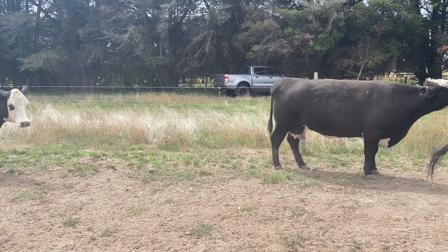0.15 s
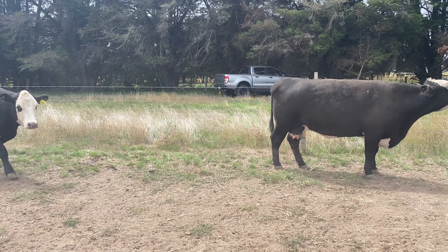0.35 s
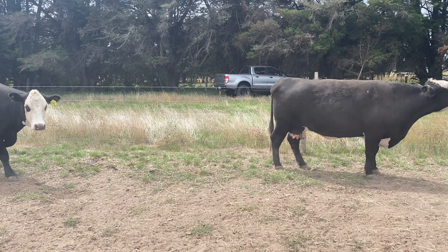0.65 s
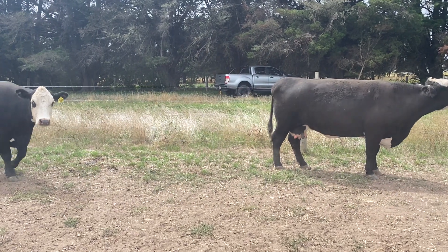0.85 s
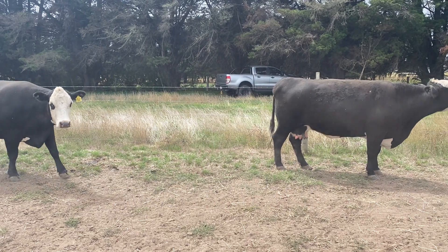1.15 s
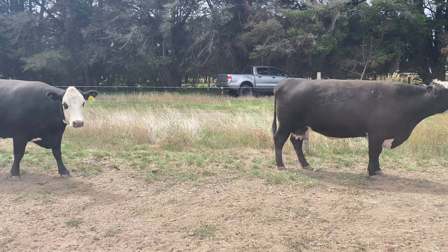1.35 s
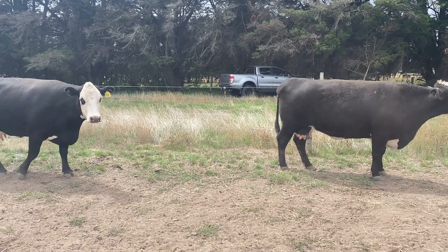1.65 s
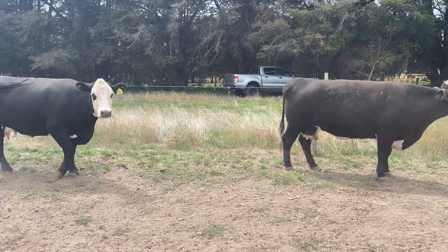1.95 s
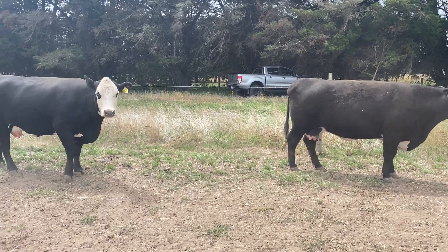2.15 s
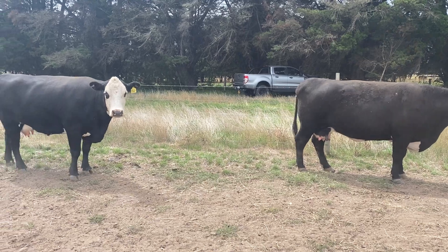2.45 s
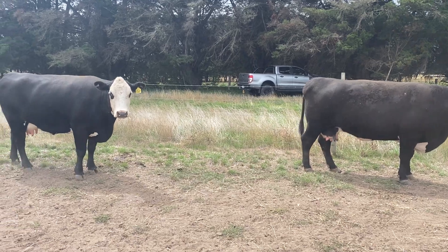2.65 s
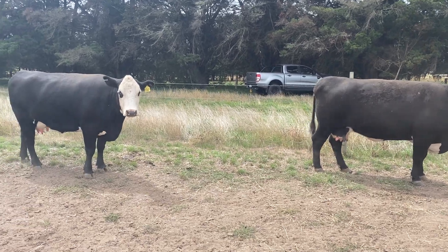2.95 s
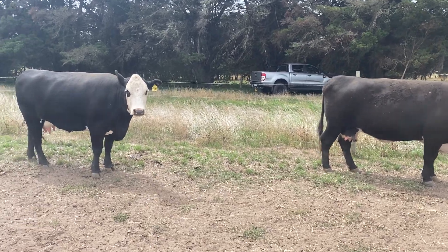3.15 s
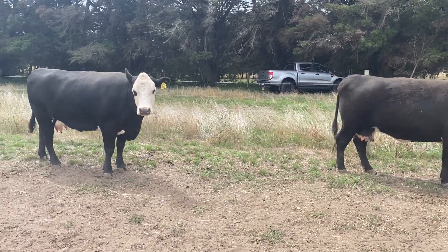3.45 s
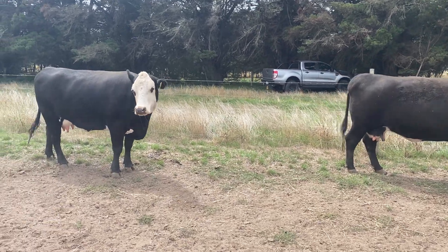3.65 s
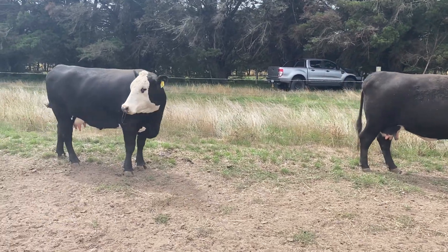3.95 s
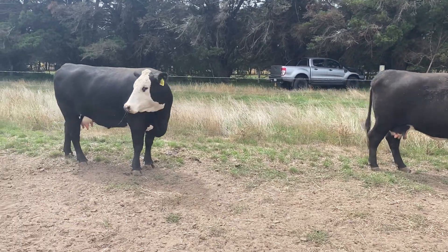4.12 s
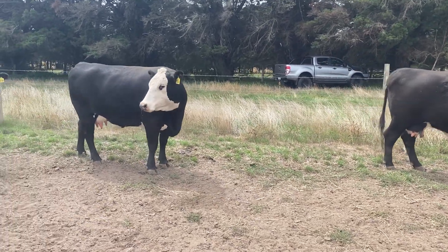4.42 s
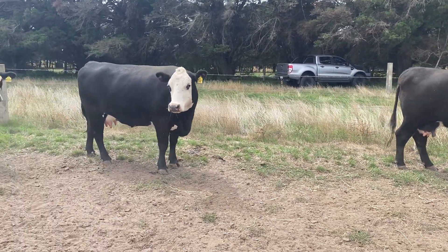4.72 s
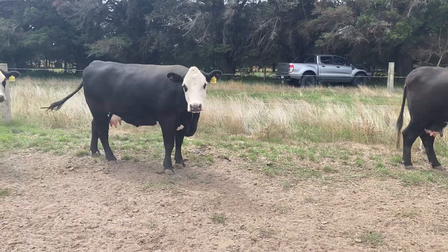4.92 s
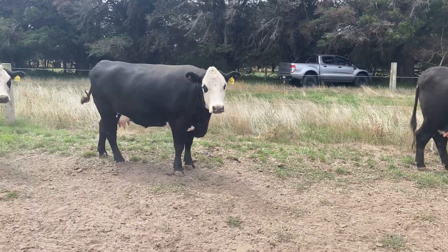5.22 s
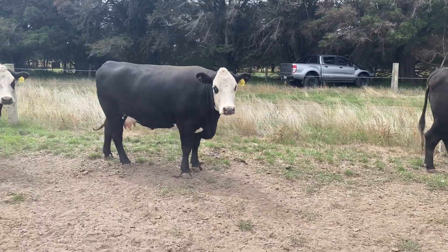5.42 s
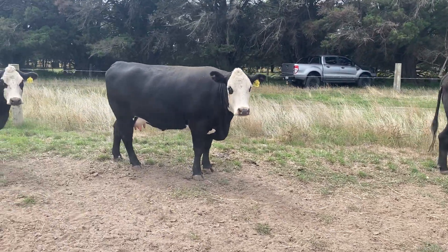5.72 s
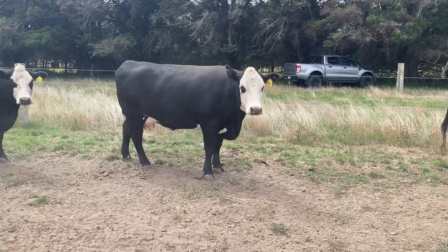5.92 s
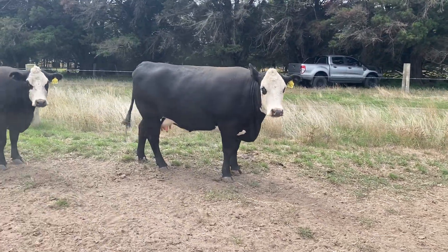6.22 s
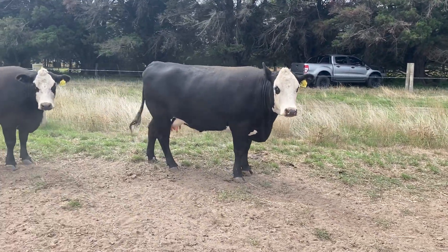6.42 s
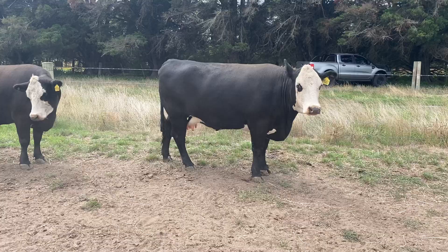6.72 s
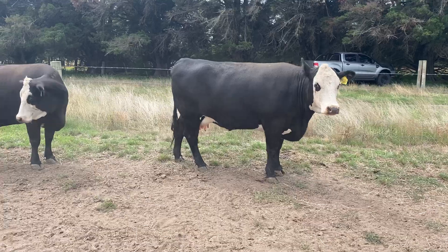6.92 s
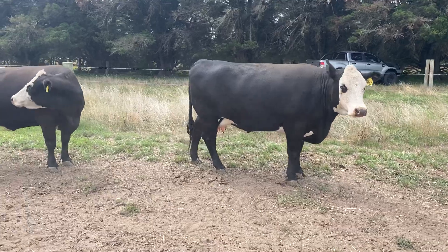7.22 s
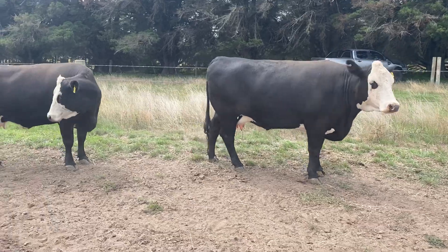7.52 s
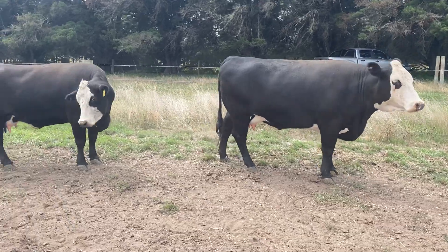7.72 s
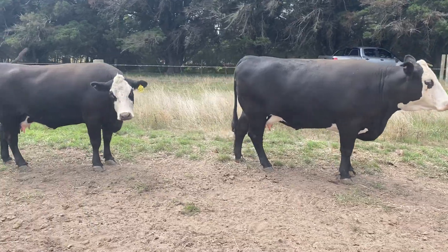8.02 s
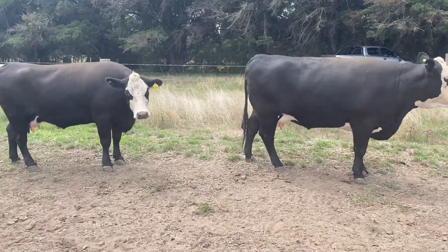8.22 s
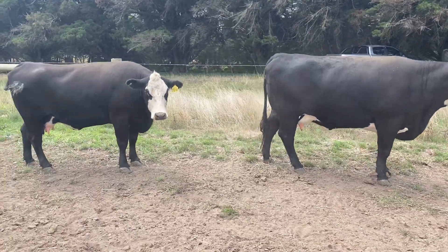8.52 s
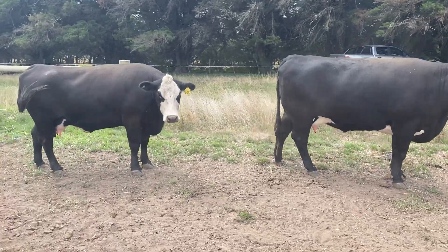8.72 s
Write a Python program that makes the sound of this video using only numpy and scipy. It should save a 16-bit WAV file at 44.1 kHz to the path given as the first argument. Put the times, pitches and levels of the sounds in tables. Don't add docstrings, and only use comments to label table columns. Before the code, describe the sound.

In a dry paddock edged by tall trees, a near cow repeats a half-second, low buzzy moo that rises and shuts off, about once a second, growing louder. Cows on either side overlap it, two calf bawls come higher, and a distant herd murmurs. Soft wind bumps and very faint insects lie below; stereo outdoor pickup, fairly dry, with a dull tree echo.

```python
import sys
import numpy as np
from scipy import signal
from scipy.fft import rfft, irfft, next_fast_len
from scipy.io import wavfile
from scipy.ndimage import uniform_filter1d

SR = 44100
rng = np.random.default_rng(int(sys.argv[2]) if len(sys.argv) > 2 else 0)


def wav_out(sig):
    wavfile.write(sys.argv[1], SR, np.round(np.clip(np.atleast_2d(sig).T, -1, 1) * 32767).astype(np.int16))


def volts_from_decibels(level):
    exponent = np.asarray(level, float) / 20
    return 10 ** exponent


N = 391166


def rms_one(x):
    return x / np.sqrt(np.mean(x ** 2) + 1e-20)


def table_at(table, when_s):
    s, *columns = np.transpose(table)
    return [np.interp(when_s, s, column) for column in columns]


def low_pass(x, order, hz):
    return signal.sosfilt(signal.butter(order, hz, fs=SR, output="sos"), x)


def drift(rate, size):
    r = np.exp(-80 * np.pi * rate / SR)
    white = rng.standard_normal(size // 40 + 2002)
    slow = signal.lfilter([1], [1, -2 * r, r * r], white)[2000:]
    return np.interp(np.arange(size) / 40, np.arange(len(slow)), slow / (np.std(slow) + 1e-9))


def resonance(x, hz, width_hz):
    r = np.exp(-np.pi * width_hz / SR)
    b = (1 - r * r) / 2 * np.array([1, 0, -1])
    a = [1, -2 * r * np.cos(2 * np.pi * hz / SR), r * r]
    return signal.lfilter(b, a, signal.lfilter(b, a, x))


def two_ears(x, ears, pan_db):
    size = next_fast_len(len(x) + 512)
    hz, tilt_db, turn = np.transpose(ears)
    pitch = np.log(np.arange(size // 2 + 1) * SR / size + 1)
    half = volts_from_decibels((pan_db + np.interp(pitch, np.log(hz), tilt_db)) / 2)
    late = np.exp(-1j * np.interp(pitch, np.log(hz), turn))
    return irfft(rfft(x, size) * np.array([half * late, 1 / half]), size)[:, :len(x)]


def folds_and_breath(pitch):
    jitter, breath_db = 0.003, -11
    size = len(pitch)
    cycles = rng.random() + np.cumsum(pitch * (1 + jitter * drift(40, size))) / SR
    closing = np.flatnonzero(np.diff(np.floor(cycles))) + 1
    early = cycles[closing] % 1 / (cycles[closing] - cycles[closing - 1])
    folds = np.zeros(size)
    folds[closing] = 1 - early
    folds[closing - 1] = early
    puff = rng.standard_normal(size) * np.exp(-1.8 * (cycles % 1))
    hiss = signal.sosfilt(signal.butter(2, 2200, "high", fs=SR, output="sos"), puff)
    return low_pass(rms_one(folds), 3, 2600) + volts_from_decibels(breath_db) * rms_one(hiss + 0.024 * puff)


def shaping_db(hz, part, sag, unclimbed):
    db = -85 * sag * np.clip(np.log2(hz / 480), 0, 1.2) * (0.12 if hz > 2000 else 1)
    db += 50 * sag * np.exp(-(sag / 0.17) ** 2 - (np.log2(hz / 460) / 0.75) ** 2)
    db -= 89.5 * sag * (part == "throat")
    db -= 42.5 * np.minimum(sag, 0.2) * (part == "chest")
    db -= 69.5 * np.clip(sag - 0.09, 0, 1) * (part == "closing")
    db -= 22.5 * unclimbed * (part == "ring")
    db += 25 * sag * (hz < 150)
    db += 45 * np.clip(sag - 0.25, 0, 1) * (150 < hz < 300)
    db += 110 * np.minimum(sag, 0.17) * (part == "boom")
    db -= 12 * unclimbed * np.clip(np.log2(hz / 2600), 0, 2.5)
    return db


def moo(rows, throat, parts, pose):
    s, pitch_hz, level_db = np.transpose(rows)
    place, (stretch, swallowed), posed_db = pose
    start = max(int(s[0] * SR), 0)
    t = np.arange(start, min(int((s[-1] + 0.03) * SR), N)) / SR
    pitch = uniform_filter1d(np.interp(t, s, pitch_hz), size=900, mode="nearest")
    source = folds_and_breath(pitch)
    highest = np.maximum.accumulate(pitch)
    sag = 1 - pitch / highest
    unclimbed = 1 - highest / pitch_hz.max()
    voice = np.zeros(len(t))
    for (hz, width_hz, db), part in zip(throat, parts):
        if part == "ring":
            hz = hz * stretch
        restless_db = 1.4 if hz < 2000 else 2.6 if width_hz < 300 else 1.1
        moving_db = shaping_db(hz, part, sag, unclimbed) + restless_db * drift(7, len(t))
        tone = low_pass(resonance(source, hz, width_hz), 4, 1.35 * hz)
        voice += volts_from_decibels(db + posed_db.get(part, 0) + moving_db) * tone
    voice = voice - np.clip(swallowed, 0, 1) * resonance(voice, hz=278.7, width_hz=120)
    power = uniform_filter1d(uniform_filter1d(voice ** 2, size=1000), size=1000)
    even = voice / np.sqrt(power + 1e-9)
    fade_in = np.clip((t - s[0]) / 0.03 + (start == 0), 0, 1)
    fade_out = np.clip((s[-1] + 0.03 - t) / 0.04, 0, 1)
    effort_db = uniform_filter1d(np.interp(t, s, level_db), size=1000)
    effort_db -= 9 * np.clip((sag - 0.21) / 0.084, 0, 1) * ("boom" in parts)
    return start, fade_out * fade_in * two_ears(even * volts_from_decibels(effort_db), *place)


def call_rows(call, shape):
    start_s, length_s, low_hz, top_hz, level_db = call
    share, climb, effort_db = np.transpose(shape)
    pitch_hz = low_hz + (top_hz - low_hz) * climb
    return np.transpose([start_s + length_s * share, pitch_hz, level_db + effort_db])


def animal(calls, shape, throat, parts, poses, gain_db):
    out = np.zeros((2, N))
    for call, pose in zip(calls, poses):
        start, sound = moo(call_rows(call, shape), throat, parts, pose)
        out[:, start:start + sound.shape[1]] += volts_from_decibels(gain_db) * sound
    return out


def standing(calls, shape, throat, place, gain_db, parts=["still"] * 11, mouth_db=[0] * 9, nose_db=[0] * 9):
    poses = [[place, (1, 0), dict(mouth=m_db, wide=8.0 * m_db, nose=n_db)]
             for m_db, n_db in zip(mouth_db, nose_db)]
    return animal(calls, shape, throat, parts, poses, gain_db)


# (pitch [Hz], left-right [dB], left lag [radians])
EARS_NEAR = [(150, -0.5, 2.1), (273, -3, 1.55), (350, -5, 0.98), (566, 2.5, 1.58), (650, -2.5, 2.5),
             (1000, -4, 1.62), (1800, 1, 2), (2700, 4, .2)]
EARS_TURNED = [(150, 1.5, 1), (250, -2.5, 1.72), (505, 1.5, 2), (760, 1.5, 3.5), (1370, -3.5, 3.5),
               (2200, 2.5, 1.93), (2900, 5, -1.7), (3800, 0, 0.96)]
# (time [s], left-right [dB], chest [dB], throat [dB], mouth [dB], bright [dB], nose [dB])
NEAR_HEAD = [(0, 0.5, 10, 16, -2, 10, 18.5), (0.899, 1, 8.5, 12, -2, 4.5, 15), (2, 0.5, 5.5, 9, 2.5, 3, 15),
             (3.5, 0, 2, 6.5, 5.5, -0.5, 6.5), (5.402, 0, 4, 1.5, 3.5, -3.5, 2),
             (6.296, -1.5, 3.5, 6, -1, -0.5, 10), (7.202, -0.9, 2.5, -20, 4, 7, -22.5),
             (8.098, -0.5, 3.5, -27.5, 6.5, 10.5, -27), (8.8, -2.5, 6.5, -8, 12, 10.5, -5)]
# (time [s], level [dB])
NEAR_TONGUE = [(0, -3.5), (5.4, 2), (6.3, 5), (7.2, -1.5), (8.1, 10), (8.8, -4.5)]
# (time [s], level [dB])
NEAR_DEPTH = [(0, 2), (2.002, 1.5), (4.5, 2.5), (6.301, -1), (7.299, 6.5), (8.15, 2.5)]
# (time [s], ring stretch [ratio], share swallowed [0-1], boom [dB])
NEAR_NOSE = [(0.099, 0.95, 0, -4), (0.901, 0.98, 0.4, 1), (1.8, 0.96, 0.9, 0.5), (2.65, 0.99, 0.9, 3.5),
             (3.549, 1.06, 0.8, -0.5), (4.499, 1.07, 0.7, -4), (5.401, 1.0, .2, 0.5),
             (6.3, 1.02, 0.4, -2.5), (7.299, 1.1, 0.2, -4), (8.15, 1.5, 0.08, -5)]
# (time [s], cheek [dB], teeth [dB], gum [dB], lip [dB], nostril [dB])
NEAR_JAW = [(.1, -2.5, -0.5, 0, -0.5, -3), (.9, -0.5, 1.5, -10, 2, -4), (1.8, 2.5, -4, 1, -1, 0),
            (2.65, -2, -6.5, -1, -3, -2), (3.55, 1, -6.5, -3, -5, -1.5), (4.5, -3.5, 3, 0, 0.5, 1.5),
            (5.4, -6.5, 3.5, 0.5, 9.5, 8), (6.35, -7.5, 3, 7.5, 7, -1.5), (7.3, 0.5, 0.5, 10, -2.5, -1),
            (8.15, -5, 4.5, -1, 1, 3)]
# (time [s], nasal ring [dB], front [dB], roof [dB])
NEAR_PALATE = [(.1, -3.5, -4, -1), (.9, 2, -1.5, -5), (1.798, 1.5, 1.5, -1), (2.65, -1.5, -3.5, -9),
               (3.55, -0.5, -4.5, -7), (4.501, 2, -3, -9), (5.4, 2.5, 3, -1.5), (6.349, 7, 1, -11),
               (7.3, 7.5, -3.5, -1), (8.15, 4, 0, 0.5)]


def near_pose(call):
    middle_s = call[0] + call[1] / 2
    pan_db, chest, throat, mouth, bright, nose = table_at(NEAR_HEAD, middle_s)
    [tongue] = table_at(NEAR_TONGUE, middle_s)
    [depth] = table_at(NEAR_DEPTH, middle_s)
    *pocket, boom = table_at(NEAR_NOSE, middle_s)
    cheek, teeth, gum, lip, nostril = table_at(NEAR_JAW, middle_s)
    ring, front, roof = table_at(NEAR_PALATE, middle_s)
    place = EARS_NEAR if middle_s < 6 else EARS_TURNED, pan_db
    levels = dict(low=chest + depth, chest=chest, throat=throat, mouth=mouth, bright=bright, boom=boom,
                  tongue_up=bright + tongue, tongue_down=bright - tongue, ring=nose + ring,
                  front=bright + front, roof=bright + roof, cheek=bright + cheek, teeth=bright + teeth,
                  gum=bright + gum, lip=bright + lip, nostril=bright + nostril)
    return place, pocket, levels


# (start [s], length [s], starting pitch [Hz], top pitch [Hz], level [dB])
NEAR_CALLS = [(-0.215, 0.57, 48.54, 141, -30.5), (0.648, 0.55, 67.5, 142.7, -27),
              (1.526, 0.54, 65.1, 140.3, -27.5), (2.364, 0.56, 68.14, 139.9, -24.5),
              (3.274, 0.58, 66.68, 137.5, -25), (4.205, 0.56, 66.4, 135.2, -24),
              (5.155, 0.53, 67.22, 134.7, -23), (6.082, 0.579, 65.8, 135.9, -21.5),
              (7.038, 0.48, 65.25, 129.6, -21), (7.891, 0.5, 69.76, 132.6, -20.5),
              (8.773, 0.65, 70, 140.9, -18)]
# (share of the call [0-1], climb to top pitch [0-1], effort [dB])
NEAR_SHAPE = [(0, 0.01, -17), (.233, .5, -7), (0.388, .79, -2), (0.503, .92, -4.5), (0.665, 0.98, -0.5),
              (0.834, 0.96, -1.5), (0.903, .79, -1), (.97, .45, 1.5), (1.101, -.15, -14)]
# (pitch [Hz], width [Hz], level [dB])
NEAR_THROAT = [(145.5, 98, -6.5), (229.5, 60, 6.5), (408.4, 46.6, 0), (512.7, 76.6, 7.5), (647, 180, -2),
               (780, 58, -5.5), (1057, 100, -15.5), (1441, 280, -19.5), (2220, 180, -28), (2620, 110, -32),
               (2917, 130, -41), (3700, 110, -37), (3350, 170, -36.5), (4110, 240, -44.5), (5060, 300, -47),
               (6300, 560, -49), (4340, 3400, -53.5), (458.7, 62, -10), (4550, 230, -42.5),
               (8000, 4500, -61.5)]


def near_cow():
    parts = ("low chest throat closing mouth mouth ring bright front tongue_down tongue_up teeth cheek gum "
             "nostril bright bright boom lip bright").replace("gum nostril", "gum nostril").split()
    return animal(NEAR_CALLS, NEAR_SHAPE, NEAR_THROAT, parts, map(near_pose, NEAR_CALLS), gain_db=7.5)


# (pitch [Hz], left-right [dB], left lag [radians])
EARS_LEFT = [(300, 0, 0.74), (540, 8, 1.4), (720, 1.5, 5.06), (990, -3.5, 4.86), (1750, -4, 4.6),
             (2250, -2, 8.4), (3470, 3, 5), (4700, -4, 4.9)]
# (start [s], length [s], starting pitch [Hz], top pitch [Hz], level [dB])
GLIDING_CALLS = [
    (-.17, 0.37, 95, 170.6, -39.5),
    (0.408, 0.41, 102.6, 173.6, -32),
    (1.375, 0.34, 95.1, 166, -30),
    (2.2, 0.46, 92.1, 163.9, -33.5),
    (3.204, 0.44, 87.56, 165, -30.5),
    (4.246, 0.39, 96.9, 166.8, -30),
    (5.318, 0.43, 107.2, 158.3, -31.5),
]
# (share of the call [0-1], climb [0-1], effort [dB])
GLIDING_SHAPE = [(0, 0.027, -7.5), (.37, 0.59, -8.5), (0.662, .87, -1), (0.85, 1, 0.5), (0.997, .9, -6),
                 (1.08, 0.19, -1)]
# (pitch [Hz], width [Hz], level [dB])
GLIDING_THROAT = [(186, 190, -4.5), (221.7, 22, 4.5), (554, 170, -14.5), (805.4, 45, -8.5),
                  (1400, 1900, -46), (2120, 310, -42.5), (3800, 380, -50.5)]
GLIDING_MOUTH = [-0.5, -12.5, -14, -6, -3.5, 4.5, 9.5]


def gliding_cow():
    parts = ["still"] * 3 + ["mouth"] + ["still"] * 3
    return standing(GLIDING_CALLS, GLIDING_SHAPE, GLIDING_THROAT, (EARS_LEFT, -0.3), gain_db=8.5,
                    parts=parts, mouth_db=GLIDING_MOUTH)


# (pitch [Hz], left-right [dB], left lag [radians])
EARS_RIGHT = [(150, -1, 1.5), (370, -6.5, 2.25), (647, -2, 2.17), (1038, 7, 3.98), (1410, -10, 4.93),
              (1610, -6.5, 5.38), (2460, -1, 5.25), (4500, -4, 17)]
# (start [s], length [s], starting pitch [Hz], top pitch [Hz], level [dB])
STEADY_CALLS = [
    (-0.126, 0.53, 130.8, 160.8, -30),
    (1.262, 0.55, 131.6, 165.9, -28.5),
    (2.882, 0.486, 140.9, 163.1, -26),
    (4.712, 0.52, 137.1, 160.2, -24.5),
]
# (share of the call [0-1], climb [0-1], effort [dB])
STEADY_SHAPE = [(0, 0.017, -9.5), (0.067, .15, -11.5), (0.403, .66, -3), (0.698, 0.93, -2.5),
                (0.871, 0.95, -4), (0.941, 0.62, 1.5), (1.029, 0.48, -26)]
# (pitch [Hz], width [Hz], level [dB])
STEADY_THROAT = [(175.4, 73, 0), (261, 38, -3.5), (459, 100, -6), (776, 130, -17), (1184, 600, -18),
                 (1638, 200, -22), (2402, 71, -31), (3690, 400, -48), (4300, 220, -48.5),
                 (6130, 850, -52.5), (2177, 71, -38.5)]
STEADY_MOUTH = [-8, -2, -5, -3]


def steady_cow():
    parts = ["still"] * 6 + ["mouth"] + ["still"] * 4
    return standing(STEADY_CALLS, STEADY_SHAPE, STEADY_THROAT, (EARS_RIGHT, -0.43), gain_db=6.5,
                    parts=parts, mouth_db=STEADY_MOUTH)


def trees(x, t60, cut_hz):
    t = np.arange(SR) / SR
    tail = rng.standard_normal((2, SR)) * volts_from_decibels(-60 * t / t60) * np.clip(t / 0.031, 0, 1)
    tail = signal.sosfilt(signal.butter(2, [150, cut_hz], "band", fs=SR, output="sos"), tail)
    return signal.fftconvolve(x, rms_one(tail) / np.sqrt(SR), axes=1)[:, :N]


# (pitch [Hz], level [dB per Hz])
AIR = [(25, -41), (55, -8.5), (100, -14.5), (230, -15), (450, -59), (800, -19.5), (1550, -35),
       (2100, -33.5), (3400, -53), (5000, -57), (7000, -58.5), (10000, -69.5), (13000, -71.5)]


def air(level_db):
    size = next_fast_len(N)
    hz = np.arange(size // 2 + 1) * SR / size + 1
    air_hz, air_db = np.transpose(AIR)
    colour = volts_from_decibels(np.interp(np.log(hz), np.log(air_hz), air_db))
    white = rng.standard_normal((3, size))
    rustle = two_ears(white[0], EARS_LEFT, pan_db=1.0) + 0.14 * white[1:]
    return volts_from_decibels(level_db) * rms_one(irfft(rfft(rustle) * colour, size)[:, :N])


# (time [s], level [dB], all but its nasal band [dB])
FAR_HERD = [(0, -58, -2.5), (0.502, -49, -4.5), (.9, -53.5, 0), (1.399, -59, -1), (2.2, -56, -3.5),
            (3.3, -60.5, 0), (3.899, -54.5, -0.5), (4.06, -66, 0), (4.349, -63.5, -1), (4.6, -54, 2),
            (5.601, -53.5, 0), (6.199, -62, -3), (6.65, -64, -2), (6.93, -69.5, -17), (7.298, -57, -4),
            (8.87, -59, -7)]
# (pitch [Hz], width [Hz], level [dB])
FAR_THROAT = [(228, 80, 3.5), (434, 120, -5), (818, 170, -1.5), (1190, 230, -11), (1413, 630, -16),
              (1122, 40, -7)]


def far_herd(herd_db):
    far_db, top_db = table_at(FAR_HERD, np.arange(N) / SR)
    white = rng.standard_normal(N)
    murmur = np.zeros(N)
    for hz, width_hz, db in FAR_THROAT:
        turned_db = (abs(hz - 1165) > 150) * top_db
        murmur += volts_from_decibels(db + 2 * drift(4, N) + turned_db) * resonance(white, hz, width_hz)
    murmur = low_pass(murmur, 10, 1720)
    return two_ears(rms_one(murmur) * volts_from_decibels(herd_db + far_db), EARS_RIGHT, pan_db=1.0)


# (time [s], level [dB])
GUSTS = [
    (.47, -3.5),
    (2.801, 1.5),
    (3.2, 7.5),
    (3.65, 5.5),
    (4.35, 10.5),
    (4.8, -2),
    (5.34, 16.5),
    (7.15, 10),
    (7.7, 7),
    (8.399, 14),
]


def breeze():
    gust_s, breeze_db = 0.16, -51
    t = np.arange(N) / SR
    white = rng.standard_normal(N) + 0.68 * rng.standard_normal((2, N))
    lumps = resonance(white, hz=63.0, width_hz=119)
    lumps = signal.sosfilt(signal.butter(2, 45, "high", fs=SR, output="sos"), lumps)
    gust_db = sum(db * np.exp(-((t - at_s) / gust_s) ** 2) for at_s, db in GUSTS)
    return rms_one(lumps) * volts_from_decibels(breeze_db + 5.5 + gust_db + 2.5 * drift(6, N))


# (pitch [Hz], width [Hz], level [dB])
INSECTS = [(7980, 50, -89), (8340, 290, -86), (8550, 310, -88)]


def insects():
    shared = rng.standard_normal(N + 1)
    white = np.array([shared[:-1], shared[1:]]) + rng.standard_normal((2, N))
    hiss = sum(volts_from_decibels(db + 1.5 * drift(30, N)) * rms_one(resonance(white, hz, width_hz))
               for hz, width_hz, db in INSECTS)
    return hiss * volts_from_decibels([[-2.2], [2.2]])


# (start [s], length [s], starting pitch [Hz], top pitch [Hz], level [dB])
HUMMING_CALLS = [
    (0.278, 0.21, 93.3, 108.5, -35),
    (2.08, 0.2, 91.4, 94.4, -42.5),
    (2.672, 0.19, 97.4, 113.3, -52),
    (4.442, 0.3, 91.6, 95.5, -33.5),
    (5.34, 0.762, 87.74, 113.1, -29),
    (6.636, 0.25, 95.9, 98.8, -33.5),
]
# (share of the call [0-1], climb [0-1], effort [dB])
HUMMING_SHAPE = [(0, 0.035, -17), (0.399, .67, -0.5), (0.583, .93, -2.5), (0.75, 0.97, -2.5),
                 (0.892, 0.79, -2), (1, 0.22, -12.5)]
# (pitch [Hz], width [Hz], level [dB])
HUMMING_THROAT = [(107, 54, -11.5), (194, 70, 4.5), (394, 92, -20), (597, 100, -22), (960, 130, -12.5),
                  (2430, 440, -39.5), (1204, 100, -15)]
HUMMING_MOUTH = [3.5, -16, -17, 6.5, -6.5, -21]
HUMMING_NOSE = [-5, -3, 3.5, -4.5, 6.5, 5.5]


def humming_cow():
    parts = ["still"] * 2 + ["nose"] * 2 + ["mouth"] * 3
    return standing(HUMMING_CALLS, HUMMING_SHAPE, HUMMING_THROAT, (EARS_LEFT, -0.6), gain_db=6.5,
                    parts=parts, mouth_db=HUMMING_MOUTH, nose_db=HUMMING_NOSE)


# (start [s], length [s], starting pitch [Hz], top pitch [Hz], level [dB])
CALF_CALLS = [
    (0.392, 0.49, 229, 248.9, -25),
]
# (share of the call [0-1], climb [0-1], effort [dB])
CALF_SHAPE = [(0, 0.28, -23.5), (.12, 0.86, -22), (0.3, 0.99, -13.5), (0.55, 0.99, -5.5), (0.95, 0.84, -5),
              (1.029, .8, -29)]
# (pitch [Hz], width [Hz], level [dB])
CALF_THROAT = [(235, 210, -6.5), (506, 120, 1), (749, 88, 0), (1078, 239, 0), (1261, 180, -8.5),
               (1800, 220, -13), (2396, 85, -19), (4030, 930, -45), (6340, 3200, -62.5)]
CALF_MOUTH = [0.2]


def calf():
    parts = ["still"] * 2 + ["wide"] + ["still"] * 2 + ["mouth"] * 4
    return standing(CALF_CALLS, CALF_SHAPE, CALF_THROAT, (EARS_RIGHT, -0.16), gain_db=13.5,
                    parts=parts, mouth_db=CALF_MOUTH)


# (start [s], length [s], starting pitch [Hz], top pitch [Hz], level [dB])
LATE_CALLS = [
    (7.254, 0.68, 118.2, 145.2, -23),
    (8.408, 0.425, 122, 142.9, -24.5),
    (4.14, 0.21, 100, 124, -37),
    (1.19, .15, 110, 129, -37.5),
]
# (share of the call [0-1], climb [0-1], effort [dB])
LATE_SHAPE = [(0, 0, -9), (0.15, .37, -5.5), (0.4, .82, -3.5), (.66, 0.93, 0), (0.869, 1, -1),
              (.945, -.1, -1), (.975, -0.41, -19.5)]
# (pitch [Hz], width [Hz], level [dB])
LATE_THROAT = [(154, 110, 0.5), (265.7, 73, 2.5), (473, 207, -5.5), (615, 220, -26), (1075, 257, -17),
               (2325, 290, -36), (3150, 210, -47), (4250, 520, -49)]


def late_cow():
    return standing(LATE_CALLS, LATE_SHAPE, LATE_THROAT, (EARS_LEFT, 0.47), gain_db=3.0)


# (start [s], length [s], starting pitch [Hz], top pitch [Hz], level [dB])
FAR_CALVES_CALLS = [
    (2.12, 0.3, 250.6, 264.6, -49.5),
    (3.86, 0.11, 243, 254.2, -43.5),
    (4.085, .09, 235.7, 254.5, -49.5),
    (4.185, .09, 235, 257.4, -46),
]
# (share of the call [0-1], climb [0-1], effort [dB])
FAR_CALF_SHAPE = [(0, .6, -1.5), (0.251, 1, 1.5), (.7, .9, -1.5), (1, 0.3, -5)]
# (pitch [Hz], width [Hz], level [dB])
FAR_CALF_THROAT = [(244, 93, -13.5), (513, 120, -10.5), (770, 150, 5.5), (1150, 200, -11.5),
                   (1517, 130, -12)]


def far_calves():
    return standing(FAR_CALVES_CALLS, FAR_CALF_SHAPE, FAR_CALF_THROAT, (EARS_RIGHT, -0.16), gain_db=10.5)


# (start [s], length [s], starting pitch [Hz], top pitch [Hz], level [dB])
BAWL_CALLS = [
    (4.76, 0.53, 236, 252.9, -23),
]
# (share of the call [0-1], climb [0-1], effort [dB])
BAWL_SHAPE = [(0, 0.18, -24), (.14, 0.6, -13), (0.352, 0.75, -6), (0.549, 0.9, -3), (.75, 0.88, -1.5),
              (0.931, .98, -1), (1.047, 1, -24.5)]
# (pitch [Hz], width [Hz], level [dB])
BAWL_THROAT = [(258, 180, -15), (502, 60, -3.5), (740, 210, 3), (1026, 250, -4), (1244, 160, -8),
               (1450, 360, -15), (1720, 270, -17), (2064, 170, -18), (2290, 190, -23.5), (4130, 820, -43),
               (6340, 2400, -48)]


def bawling_calf():
    return standing(BAWL_CALLS, BAWL_SHAPE, BAWL_THROAT, (EARS_RIGHT, -0.16), gain_db=11.5)


def scene():
    herd = near_cow() + gliding_cow() + steady_cow() + humming_cow()
    herd = herd + calf() + late_cow() + far_calves() + bawling_calf()
    echo = volts_from_decibels(-27) * trees(herd, t60=0.5, cut_hz=2500)
    return herd + echo + air(level_db=-54.0) + far_herd(herd_db=21.5) + breeze() + insects()


def band_limit(x):
    return signal.sosfilt(signal.butter(12, 12500, fs=SR, output="sos"), x)


def record(dry):
    lows = low_pass(dry.mean(axis=0), 4, 450)
    mirror = volts_from_decibels(-69) * lows * np.cos(2 * np.pi * 12000 * np.arange(N) / SR)
    return band_limit(dry + mirror)


dry = scene()
out = record(dry)
wav_out(out)
```